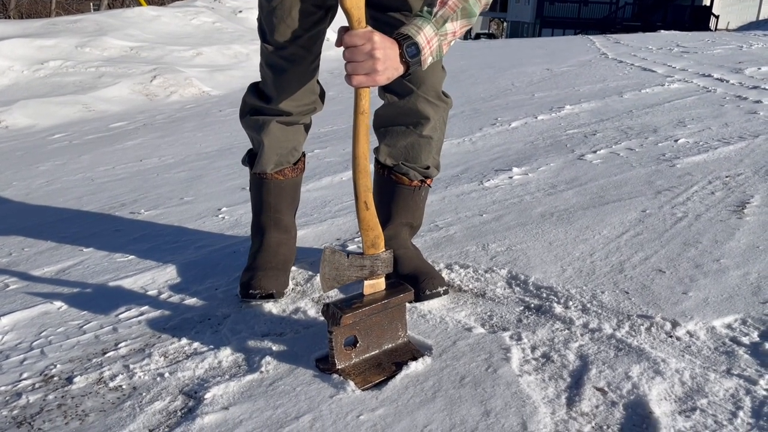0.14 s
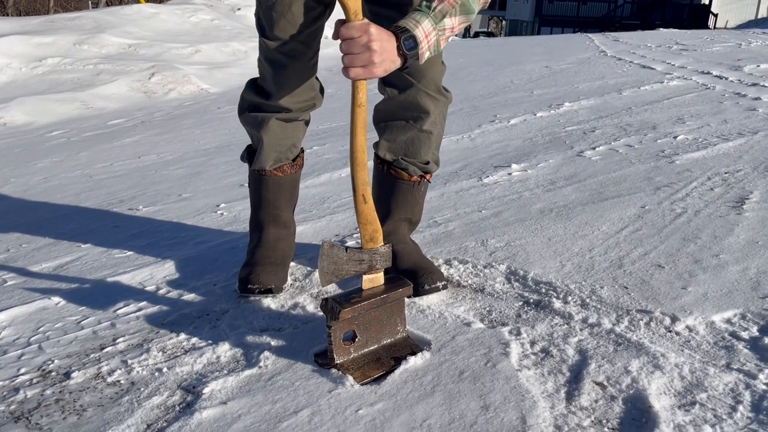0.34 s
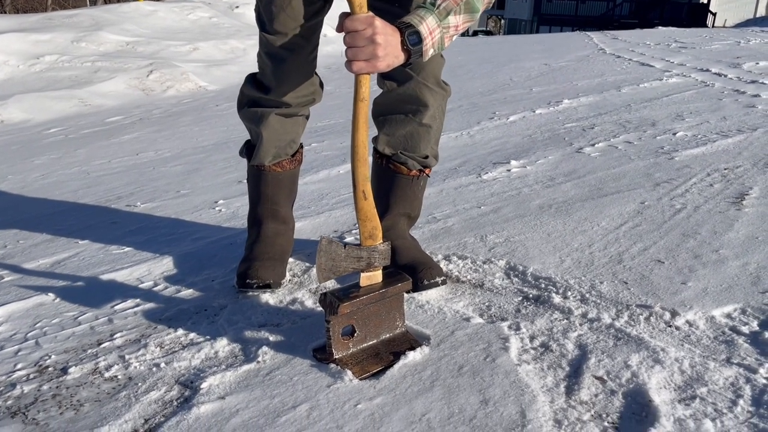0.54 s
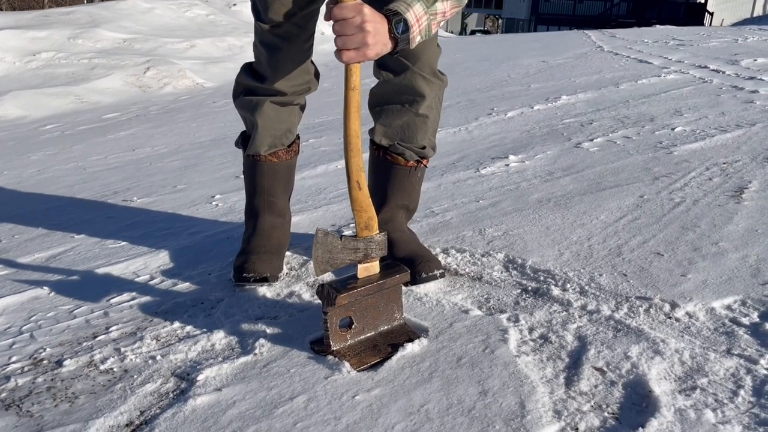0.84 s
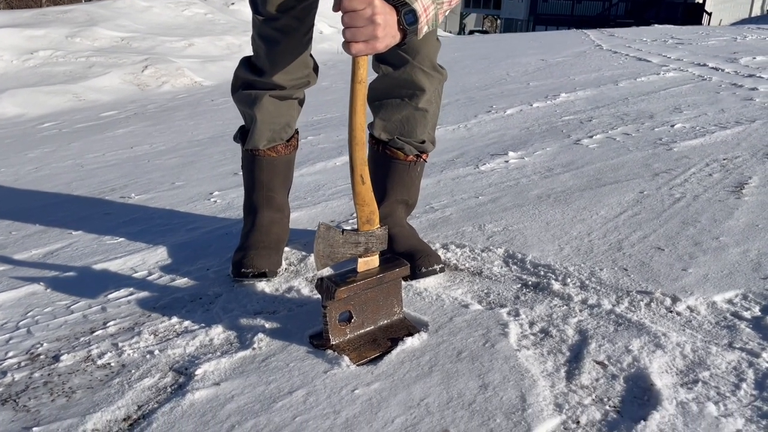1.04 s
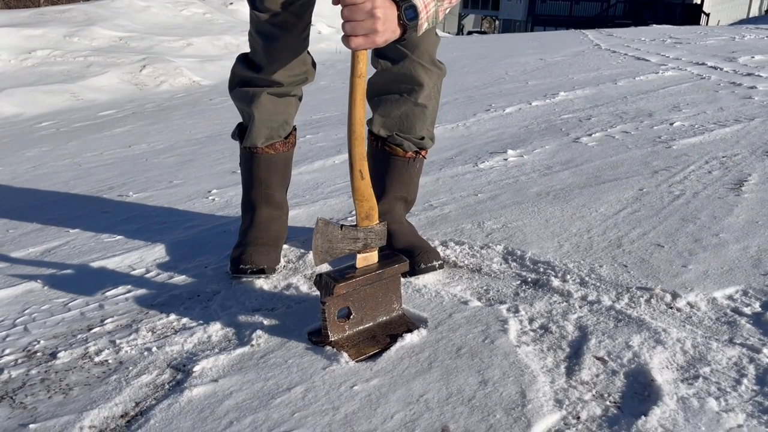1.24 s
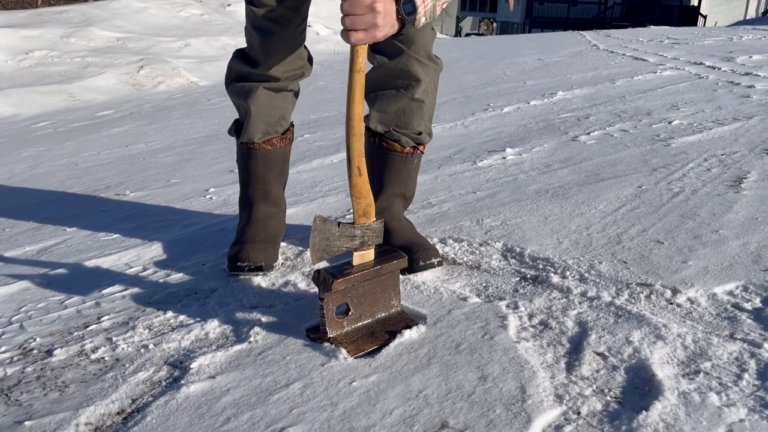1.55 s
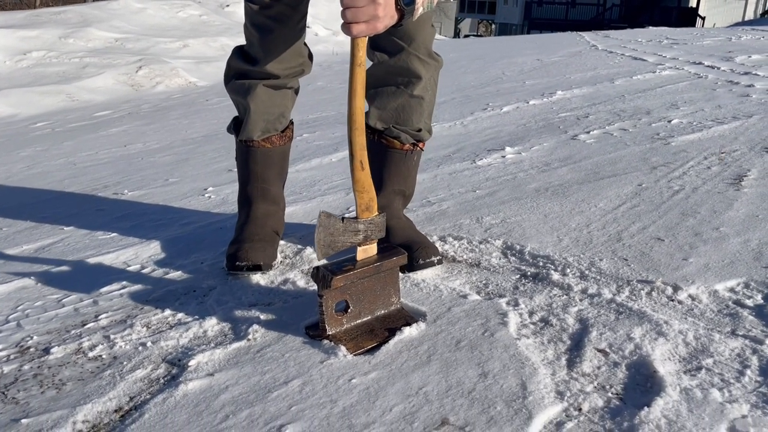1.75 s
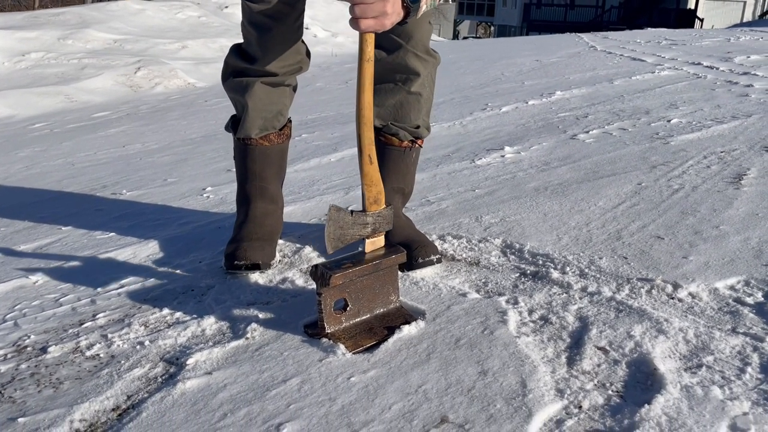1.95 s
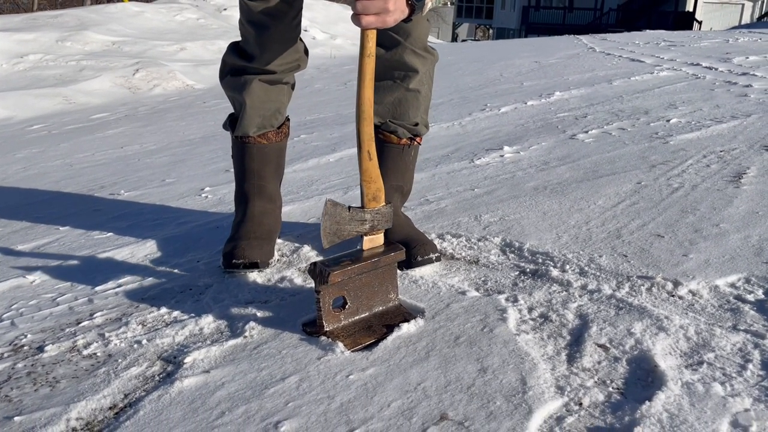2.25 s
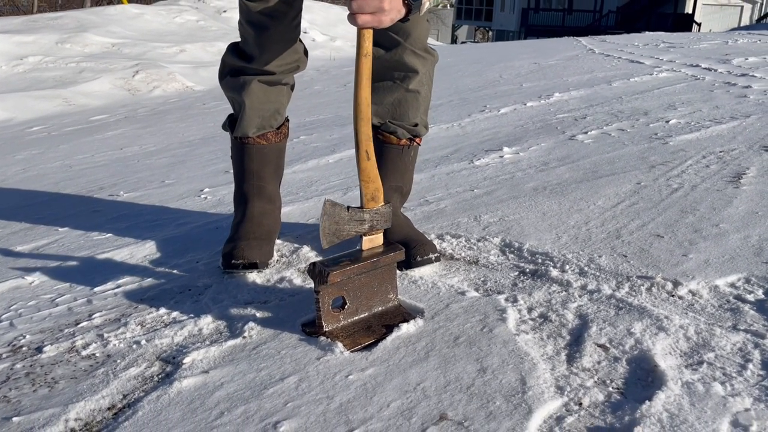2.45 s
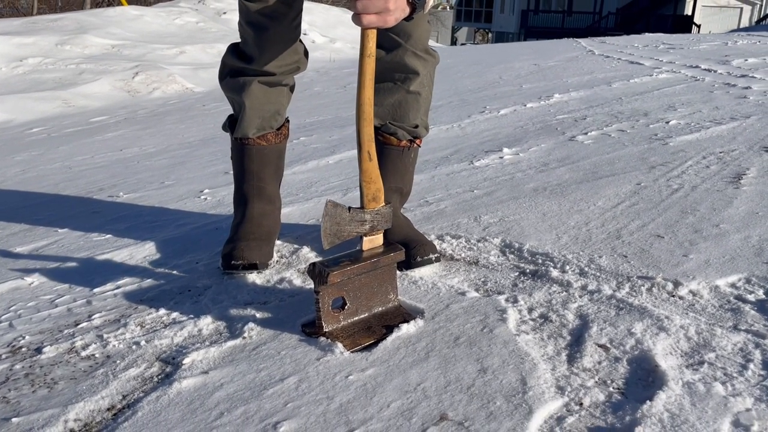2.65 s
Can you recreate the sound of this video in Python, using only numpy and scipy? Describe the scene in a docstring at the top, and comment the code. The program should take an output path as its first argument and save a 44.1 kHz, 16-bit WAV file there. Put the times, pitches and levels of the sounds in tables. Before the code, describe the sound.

Two loud, short knocks of axe head on heavy steel, thuddy and barely ringing, heard close in an open quiet yard; low fluttering wind buffets the microphone before, between and after, with faint handling ticks.

```python
"""An axe, head down, is banged twice on a short piece of steel rail lying in snow.
Each blow layers a crack of filtered noise, a dull thud (one pressure swing), dying steel modes and bounces.
The yard answers with a short scatter and a faint echo, made by convolution with fading noise.
Wind buffets the microphone as gusty noise and single swings, over faint handling ticks, quiet air and hiss.
A limiter in the recorder ducks the whole mix when it gets loud, holds, then recovers."""
import sys
import numpy as np
from scipy import signal
from scipy.fft import rfft, irfft, next_fast_len
from scipy.io import wavfile
from scipy.ndimage import uniform_filter1d, minimum_filter1d

SR = 44100
rng = np.random.default_rng(int(sys.argv[2]) if len(sys.argv) > 2 else 0)


def persist_wave(psi):
    """Save psi, clipped to +-1, as 16-bit WAV."""
    counts = np.round(np.clip(psi, -1, 1) * 32767).astype(np.int16)
    wavfile.write(sys.argv[1], SR, np.atleast_2d(counts).T)


N = 123479  # length [samples]

# how steeply an eddy's spectrum rises below its centre, and how its upper skirt falls
EDDY_SHARP, EDDY_SKIRT = 2.17, 1.733


def amp(db):
    """Decibels to gain."""
    return 10 ** (np.asarray(db) / 20)


def unit(x):
    """Scales to rms 1."""
    return x / np.sqrt(np.mean(x ** 2) + 1e-20)


def read(table, hz, axis=1):
    """Reads one column of a spectrum on a log-frequency axis."""
    table = np.array(table, float)
    return np.interp(np.log(hz + 1), np.log(table[:, 0] + 1), table[:, axis])


def add(mix, s, sound):
    """Adds a sound at a time in seconds."""
    part = mix[round(s * SR):][:len(sound)]
    part += sound[:len(part)]


def freqs(size):
    """Frequencies of a spectrum's bins in Hz."""
    return np.fft.rfftfreq(size, 1 / SR)


def noise(table, axis=1):
    """Steady noise of rms 1 with a given spectrum."""
    size = next_fast_len(N, real=True)
    spectrum = rfft(rng.standard_normal(size)) * amp(read(table, freqs(size), axis))
    return unit(irfft(spectrum, size)[:N])


def pair(table, same, axis=1):
    """Left and right noise that are partly alike; same is their correlation."""
    mid = np.sqrt((1 + same) / 2) * noise(table, axis)
    side = np.sqrt((1 - same) / 2) * noise(table, axis)
    return np.array([mid + side, mid - side])


def steadied(x, size):
    """Evens out the slow swells of a noise, so that the gusts set its level."""
    power = uniform_filter1d((x ** 2).mean(0), size=size)
    return x / np.sqrt(abs(power) + 1e-9)


def chatter(length, fall, table, axis=1, size=2048):
    """A few milliseconds of rough contact with an even spectrum, rung through a body's colour."""
    t = np.arange(size) / SR
    shape = np.exp(-np.maximum(t - length, 0) / fall)
    burst = rng.standard_normal(size) * shape
    for _ in range(2):  # flatten the spectrum, then restore the envelope
        burst = irfft(np.exp(1j * np.angle(rfft(burst)))) * shape
    log_gain = np.log(amp(read(table, abs(np.fft.fftfreq(size, 1 / SR)), axis)))
    minimum_phase = np.exp(np.conj(signal.hilbert(log_gain)))  # keeps the onset sharp
    burst = np.fft.ifft(np.fft.fft(burst) * minimum_phase).real
    return burst / np.sqrt(np.sum(burst ** 2) / (length * SR))


def push(s, hz, sharp, skirt, size=4096):
    """One pressure swing of peak 1 around a centre frequency; returns start time and sound."""
    ratio = freqs(size) / hz + 1e-6
    spectrum = ratio ** sharp * np.exp(-sharp / skirt * (ratio ** skirt - 1))
    swing = np.fft.fftshift(irfft(-spectrum))
    return s - size / 2 / SR, swing / abs(swing).max()


def ring(hz, t60, size=12000):
    """One dying mode, split into a close pair, with a soft start."""
    rise_s, split = 0.00036, 0.0064  # split: largest detuning, as a share of the pitch
    t = np.arange(size) / SR
    tones = np.zeros(size)
    for share in (1, .5):
        detuned_hz = hz * (1 + split * rng.uniform(-1, 1))
        tones += share * np.sin(2 * np.pi * (detuned_hz * t + rng.random()))
    return (1 - np.exp(-t / rise_s)) * amp(-60 * t / t60) * tones


def axe():
    """Each blow excites a crack, a thud and a ring; the head then bounces and settles."""
    # the two blows: (time [s], crack level [dB], thud level [dB], ring level [dB])
    blows = [(0.4342, 2.5, 14.5, -6), (1.3338, 1.5, 10.5, -4)]
    out = np.zeros(N)
    for k, (s, crack_db, thud_db, ring_db) in enumerate(blows):
        crack_s = 0.003
        add(out, s, amp(crack_db) * crack(crack_s, k + 1))
        start, thud = push(s + .001, 398, sharp=2.0, skirt=1.5)  # dull swing around 398 Hz, 1 ms late
        add(out, start, amp(thud_db) * thud)
        add(out, s + crack_s / 2, amp(ring_db) * steel())
    return out + bounces()


def crack(length, blow):
    """Hard rough contact, whose colour depends on how the head lands."""
    # colour of the crack: (frequency [Hz], first blow [dB], second blow [dB])
    crack_colour = [(330, -10, -10.5), (857, 6.5, 3), (1075, -13.5, -12), (1230, 2, 4.5),
                    (1770, -15, -17.5), (2090, 2, 2), (2430, -13.5, 1), (2730, -24, -9),
                    (3420, -0.5, -10.5), (3700, -5, -11), (4100, -20.5, -8.5), (5160, -19.5, -23.5),
                    (6880, -16.5, -9), (7240, -7.5, -18), (7980, -32.5, -36.5), (10450, -13.5, -9),
                    (11000, -21, -23.5), (12400, -23.5, -16), (16000, -29, -28.5)]
    return chatter(length, 0.0016, crack_colour, axis=blow)


def steel():
    """The modes of head and rail ring together, each dying at its own rate."""
    # modes of head and rail: (frequency [Hz], relative level [dB], time to fall 60 dB [s])
    modes = [(695, -9.5, 0.065), (1238, -9.5, 0.016), (1380, -5.5, 0.025), (1880, -10.5, 0.042),
             (2127, -2, 0.0089), (2220, 1.5, 0.034), (2730, -14, 0.048), (2930, -9.5, 0.034),
             (3618, -10.5, 0.016), (3940, -8, 0.027), (5140, -19.5, .04), (6280, -22.5, 0.062),
             (10665, -11, 0.028), (11400, -16, 0.029)]
    return sum(amp(level) * ring(hz, t60) for hz, level, t60 in modes)


def bounces():
    """Each bounce is a short rough contact and one brief mode."""
    # the bounces: (time [s], level ahead of the two trims below [dB], contact length [s], pitch [Hz])
    landings = [(0.4641, -7.5, 0.0004, 2090), (0.4718, -19, 0.0012, 2120), (0.478, -27, 0.0028, 2260),
                (1.359, -19, 0.004, 2650), (1.3622, -18.5, 0.0023, 2400)]
    # colour of the contact noise: (frequency [Hz], relative level [dB])
    contact_colour = [(200, -18.5), (700, 3.5), (1400, -10), (2200, 0.5), (3300, -5.5), (4600, -15.5),
                      (7000, -19), (8500, -32.5), (12000, -46), (16000, -59)]
    contact_trim_db, ring_trim_db = -3, 2
    fall_s, ring_t60 = .0065, .02
    out = np.zeros(N)
    for s, db, length, hz in landings:
        add(out, s, amp(db + contact_trim_db) * chatter(length, fall_s, contact_colour))
        add(out, s, amp(db + ring_trim_db) * ring(hz, ring_t60))
    return out


def yard(x):
    """Direct sound at two ports, a short scatter from nearby, and a faint echo from far across the snow."""
    # the axe sits a little left: (frequency [Hz], left minus right [dB])
    balance = [(300, -0.5), (800, 2), (1300, 3.5), (2400, 4), (4400, 8.5), (8000, 0), (15000, -0.5)]
    # phase by which the right port leads: (frequency [Hz], phase [radians])
    port_phase = [(100, .1), (400, .45), (1000, .7), (2000, .7), (2800, 0.7), (5000, 1.2), (10000, 1.9),
                  (15000, 1.8)]
    # colour of the yard's reflections: (frequency [Hz], relative level [dB])
    echo_colour = [(200, -4), (1300, -4), (2600, -1.5), (3500, -1), (4600, 5.5), (6500, 1), (8500, -15),
                   (11000, 2), (16000, -10.5)]
    near_db, near_t60 = -24.5, .13
    far_db, far_s, far_t60 = -46, 0.11, .9  # far_s: when the echo sets in

    t, hz = np.arange(N) / SR, freqs(N)
    tilt = amp(read(balance, hz) / 2)
    spectrum = rfft(x)
    left = spectrum * tilt * np.exp(-1j * read(port_phase, hz))
    right = spectrum / tilt
    direct = irfft(np.array([left, right]), N)

    near = pair(echo_colour, 0.17) * amp(-60 * t / near_t60)
    far = pair(echo_colour, 0.1) * (t > far_s) * amp(-60 * abs(t - far_s) / far_t60)
    tail = (amp(near_db) * unit(near) + amp(far_db) * unit(far)) / np.sqrt(N)
    return direct + signal.fftconvolve(x[None], tail, axes=1)[:, :N]


def wind():
    """Gusts drive rumble, lumpy flutter and rustle; a rasp grows faster with their force; eddies pop."""
    # the gusts, ahead of the trims below: (time [s], rumble level [dB], flutter level [dB])
    gusts = [(0, -47, -50.5), (0.1, -34, -49.5), (0.16, -44, -47.5), (0.2, -21.5, -29.5),
             (0.24, -15.5, -24.5), (0.29, -23.5, -24.5), (0.315, -27.5, -37.5), (0.4, -24.5, -32.5),
             (0.5, -36, -30), (0.56, -22.5, -27.5), (0.63, -20.5, -24.5), (0.69, -24, -34.5),
             (0.78, -26.5, -28.5), (0.86, -27, -31.5), (0.92, -22, -24.5), (0.99, -27.5, -26),
             (1.04, -29.5, -34), (1.09, -28.5, -22.5), (1.16, -29, -27), (1.23, -26, -31),
             (1.31, -37.5, -36.5), (1.39, -32, -37.5), (1.44, -30, -30.5), (1.49, -49, -50.5),
             (1.65, -47, -52), (1.71, -30.5, -29), (1.76, -16.5, -19), (1.81, -40.5, -22.5),
             (1.862, -24.5, -19.5), (1.9, -29, -30.5), (1.96, -30.5, -32), (2.03, -42, -57.5),
             (2.08, -29, -33.5), (2.13, -35.5, -35), (2.17, -28, -25.5), (2.25, -37.5, -47.5),
             (2.32, -26.5, -26.5), (2.41, -20.5, -28), (2.45, -30.5, -26.5), (2.57, -30, -29.5),
             (2.65, -31, -36), (2.7, -40.5, -60), (2.8, -38.5, -44.5)]
    # colour of the wind: (frequency [Hz], rumble [dB], flutter [dB], both relative)
    wind_colour = [(15, -38, -41.5), (37.8, -4, -31.5), (79.5, 3.5, -26), (126.3, -4.5, 11.5),
                   (194, -18.5, 4), (362, -25.5, -4), (472, -56, -14.5), (706, -90, -35.5),
                   (1200, -83.5, -82), (3000, -100, -79.5)]
    # colour of the rasp: (frequency [Hz], relative level [dB])
    rasp_colour = [(200, -18.5), (550, -2), (850, -1), (1300, -14), (2000, -23), (3100, -26), (4200, -47)]
    rumble_trim_db, flutter_trim_db, rustle_trim_db, rasp_trim_db = 1, -4.5, -8, -2.5
    rasp_growth = 2.48  # dB of rasp per dB of wind force
    lump_db, lump_hz = 5.5, 97  # largest swing of the lumps, and their fastest rate
    same = 0.87  # likeness of left and right

    s, rumble_db, flutter_db = np.transpose(gusts)
    t = np.arange(N) / SR
    slow_noise = irfft(rfft(rng.standard_normal(N)) * (freqs(N) < lump_hz), N)
    lumps = lump_db * np.tanh(unit(slow_noise))
    force_db = np.interp(t, s, flutter_db) + lumps

    rumble = steadied(pair(wind_colour, same, axis=1), size=2200)
    rumble = rumble * amp(rumble_trim_db + np.interp(t, s, rumble_db))
    flutter = steadied(pair(wind_colour, same, axis=2), size=1100) * amp(flutter_trim_db + force_db)
    rasp = pair(rasp_colour, 0.22) * amp(rasp_trim_db + rasp_growth * force_db)
    swarm = rustle() * amp(rustle_trim_db + force_db)
    return rumble + flutter + rasp + swarm + eddies()


def eddies():
    """Each eddy is a compact pressure swing with smaller ones around it, out of step at the two ports."""
    # single eddies that pop on the microphone: (time [s], level [dB], centre frequency [Hz])
    main_eddies = [(0.1988, -12, 168), (0.2293, -8, 155), (0.2421, -5, 132), (0.2516, -8.5, 193.4),
                   (0.2593, -13.5, 310), (0.281, -5, 220), (0.2875, -10, 306), (0.3017, -18, 238),
                   (0.3305, -13, 222), (0.369, -14.5, 264), (0.3867, -11, 102), (0.52, -12.5, 208),
                   (0.549, -18, 340), (0.6135, -4, 102), (0.665, -13.5, 116.6), (0.731, -13.5, 190.4),
                   (0.8181, -16, 207.7), (0.904, -4.5, 235.3), (0.9143, -9, 119.7), (0.9834, -17, 357),
                   (1.058, -23, 339), (1.0843, -16, 246), (1.098, -17, 240), (1.1114, -18, 220),
                   (1.148, -13.5, 250), (1.1722, -6.5, 260), (1.1877, -5.5, 481), (1.263, -17, 231),
                   (1.406, -23.5, 270), (1.426, -17.5, 290), (1.673, -25.5, 247), (1.722, -21.5, 300),
                   (1.7453, -5.5, 524), (1.7557, -7, 540), (1.7624, -9.5, 405), (1.7731, -10.5, 374),
                   (1.7932, -13.5, 293), (1.8087, -13, 260), (1.8316, -4.5, 464), (1.8347, -10.5, 577),
                   (1.8421, -8, 560), (1.8539, -8.5, 690), (1.857, -9.5, 407), (1.8676, -13.5, 290),
                   (1.8723, -16, 370), (2.1438, -28.5, 307), (2.1718, -8.5, 332), (2.2822, -14, 426),
                   (2.3612, -21.5, 380), (2.3663, -15, 400), (2.378, -20, 380), (2.3918, -13.5, 342),
                   (2.4004, -14.5, 265), (2.564, -17, 140)]
    shed_db, shed_scatter_db = -12.5, 5
    shed_delay_s, shed_spread_s = .002, .007
    shed_pitch, shed_octaves = 0.95, 0.98  # pitch ratio to the main eddy, and its scatter
    apart_rad = 0.36  # each port is turned this far, in opposite directions

    out = np.zeros((2, N))
    for when, db, hz in main_eddies:
        swings = [(when, db, hz)]
        for late, weak, small in rng.uniform(-0.989, 1, size=(4, 3)):
            shed_s = when + shed_delay_s + shed_spread_s * late
            level_db = db + shed_db + shed_scatter_db * (weak - small)
            swings.append((shed_s, level_db, hz * shed_pitch * 2 ** (shed_octaves * small)))
        for s, level_db, centre_hz in swings:
            start, swing = push(s, centre_hz, EDDY_SHARP, EDDY_SKIRT)
            # a random phase turns the swing's shape
            swing = amp(level_db) * signal.hilbert(swing) * np.exp(2j * np.pi * rng.random())
            apart = np.exp(1j * apart_rad * np.sign(rng.random() - .5))
            add(out[0], start, (swing * apart).real)
            add(out[1], start, (swing / apart).real)
    return out


def rustle():
    """A swarm of tiny eddies of uneven size; the smaller, the higher and weaker."""
    low_hz, high_hz, bands = 162, 400, 6
    pops_per_s, db_per_octave = 190, -10
    out = np.zeros(N)
    for hz in np.geomspace(low_hz, high_hz, num=bands):
        pops = (rng.random(N) < pops_per_s / bands / SR) * rng.standard_normal(N)
        swing = push(0, hz, EDDY_SHARP, EDDY_SKIRT)[1]
        gain = amp(db_per_octave * np.log2(hz / low_hz))
        out += gain * signal.oaconvolve(pops, swing, "same")
    return unit(out)


def ticks():
    """Faint handling ticks: tiny dry bursts of contact noise."""
    # the ticks: (time [s], level ahead of the trim below [dB])
    tick_times = [(0.262, -55.5), (0.3344, -57.5), (0.3562, -48.5), (0.9068, -55), (0.9926, -59.5),
                  (1.1885, -53), (1.7468, -47.5), (1.7564, -48.5), (1.7648, -55.5), (1.834, -51.5),
                  (1.8555, -48), (2.4625, -52)]
    # colour of a tick: (frequency [Hz], relative level [dB])
    tick_colour = [(400, -5), (1500, 10), (2700, -1), (3800, -8), (6500, -17.5), (8500, -32.5),
                   (12000, -31), (16000, -44.5)]
    trim_db, length_s, fall_s = 6, 0.0014, 0.0024
    out = np.zeros(N)
    for s, db in tick_times:
        add(out, s, amp(db + trim_db) * chatter(length_s, fall_s, tick_colour))
    return out


def air():
    """Still outdoor air as steady noise, with a faint hiss that comes and goes."""
    # colour of the air: (frequency [Hz], relative level [dB per Hz])
    air_colour = [(100, 5), (500, 2), (950, -0.5), (1350, -4), (2400, -16.5), (3600, -28), (6900, -39.5),
                  (8200, -47.5), (12300, -32.5), (13500, -47.5), (16000, -61)]
    # swells of the hiss: (time [s], level [dB])
    hiss_level = [(0, -80.5), (0.35, -64.5), (0.62, -65.5), (1.0, -86), (1.3, -64.5), (1.52, -66.5),
                  (1.7, -69), (1.86, -66.5), (1.95, -81), (2.35, -77), (2.8, -65)]
    # colour of the hiss: (frequency [Hz], relative level [dB per Hz])
    hiss_colour = [(1000, -4.5), (2200, 1.5), (3700, -2), (5000, -8.5), (6800, -10.5), (8200, -23.5),
                   (10500, -13), (16000, -34)]
    air_db = -53.5
    hiss_db = np.interp(np.arange(N) / SR, *np.transpose(hiss_level))
    return amp(air_db) * pair(air_colour, .1) + amp(hiss_db) * pair(hiss_colour, 0.13)


def scene():
    """Axe and rail in the open, with wind, ticks and quiet air."""
    return yard(axe()) + wind() + ticks() + air()


def filtered(x, gain_at):
    """Applies a frequency response, with silence as padding."""
    size = 2 * next_fast_len(N, real=True)
    return irfft(rfft(x, size) * gain_at(freqs(size)))[..., :N]


def limited(x):
    """The limiter turns down loud moments, holds, and recovers at a steady rate in dB."""
    limit_db, hold_s, recover_db_per_s = -7, .036, 478
    power = uniform_filter1d((x ** 2).mean(0), size=100)
    power_db = 10 * np.log10(abs(power) + 1e-12)
    hold = 2 * int(hold_s * SR / 2) + 1
    over_db = np.maximum(power_db - limit_db, 0)
    held_db = -minimum_filter1d(-over_db, hold, origin=hold // 2)  # the highest of the recent past
    fall = np.arange(N) * recover_db_per_s / SR
    duck_db = np.maximum.accumulate(held_db + fall) - fall
    duck_db = uniform_filter1d(-minimum_filter1d(-duck_db, size=100), size=60)  # widened, then smoothed
    return x / amp(duck_db)


def record(dry):
    """The microphone delays and trims the bass; then come the limiter, clipping and the band limit."""
    lag_s, lag_hz = .009, 393  # delay of the deepest bass, and where it wears off
    low_cut_hz, edge_hz = 40, 16200
    x = filtered(dry, lambda hz: np.exp(-2j * np.pi * lag_s * lag_hz * np.arctan(hz / lag_hz)))
    x = signal.sosfilt(signal.butter(2, low_cut_hz, "highpass", fs=SR, output="sos"), x)
    x = np.clip(limited(x), -1, 1)
    band_limit = signal.firwin(255, edge_hz, window=("kaiser", 9), fs=SR)
    return signal.oaconvolve(x, band_limit[None], "same")


dry = scene()
out = record(dry)
persist_wave(out)
```